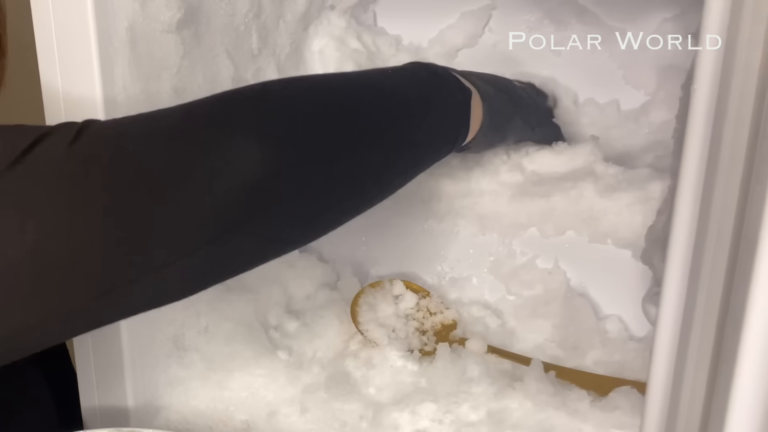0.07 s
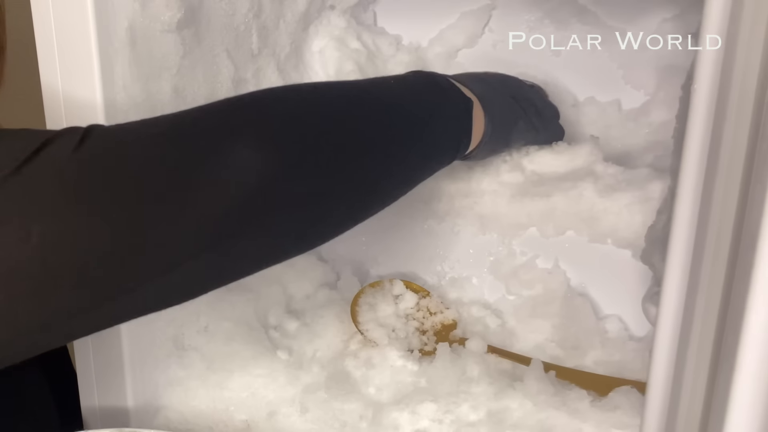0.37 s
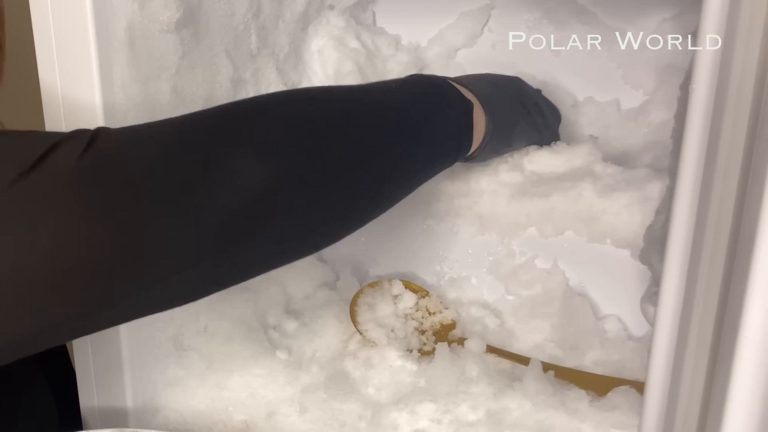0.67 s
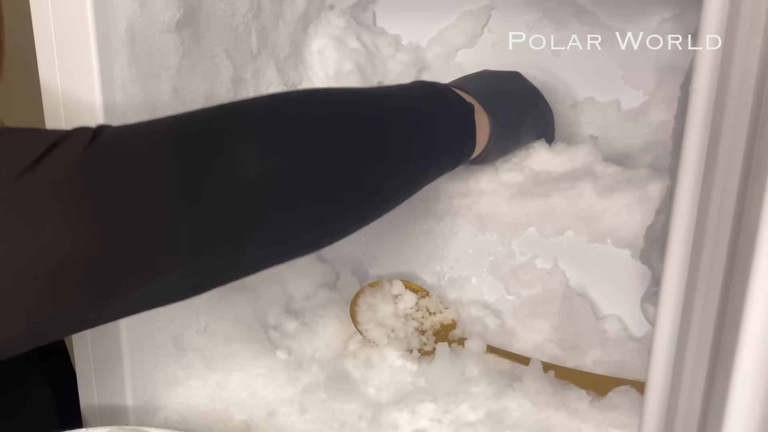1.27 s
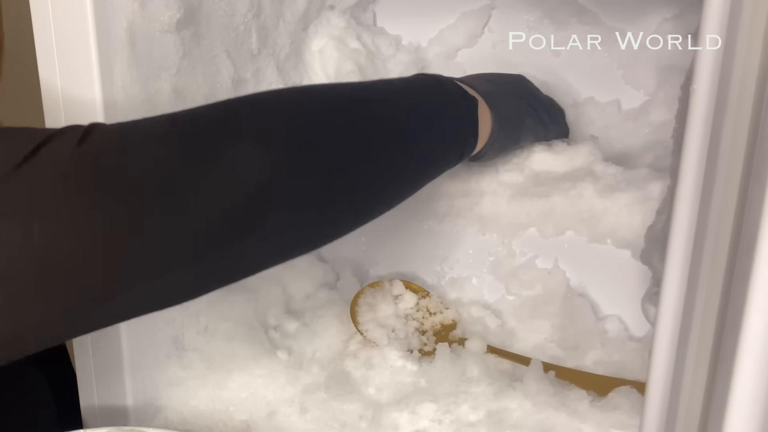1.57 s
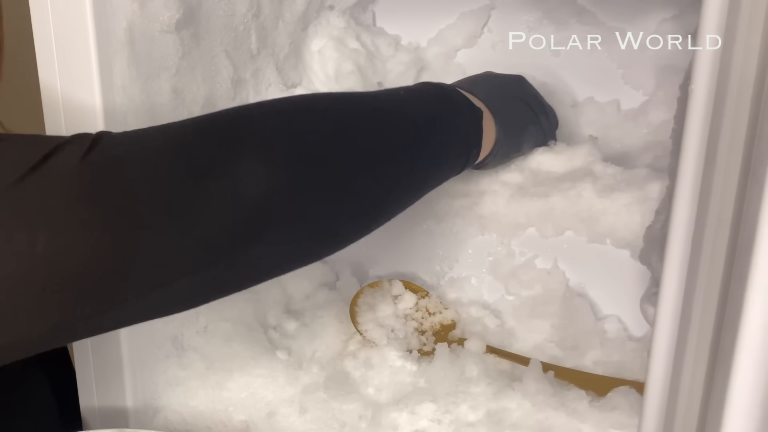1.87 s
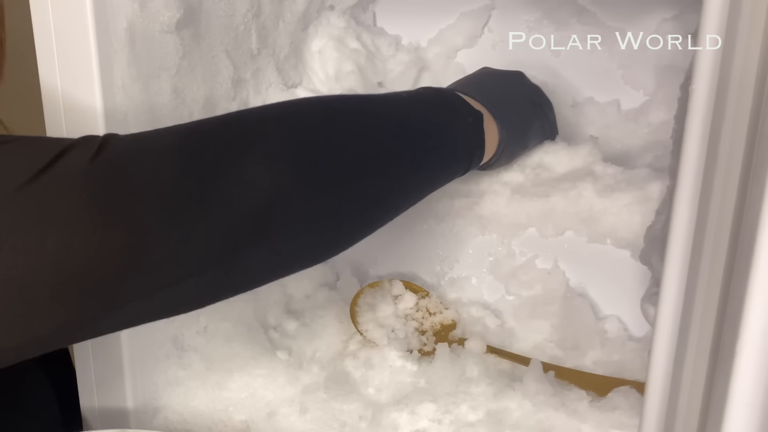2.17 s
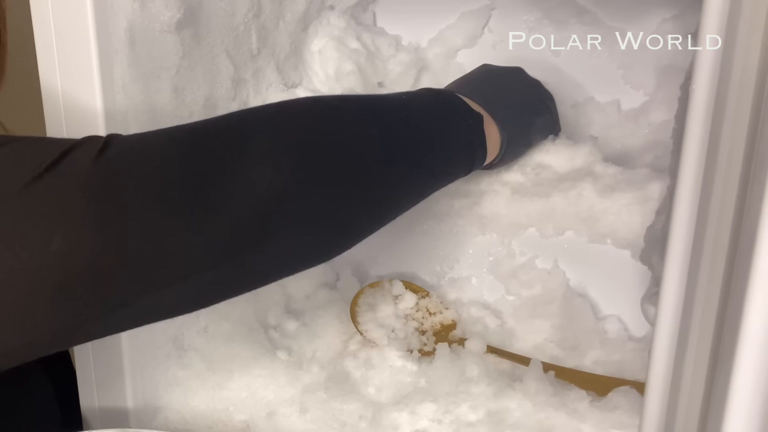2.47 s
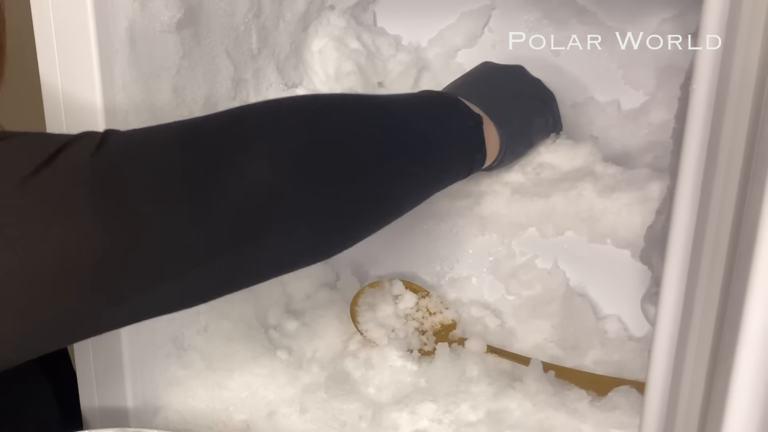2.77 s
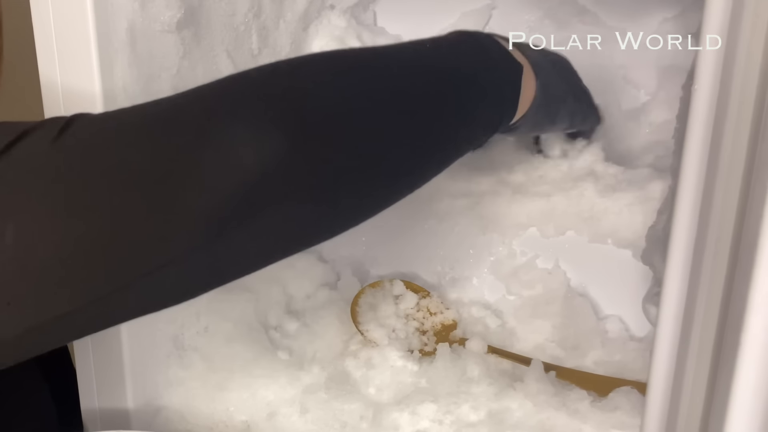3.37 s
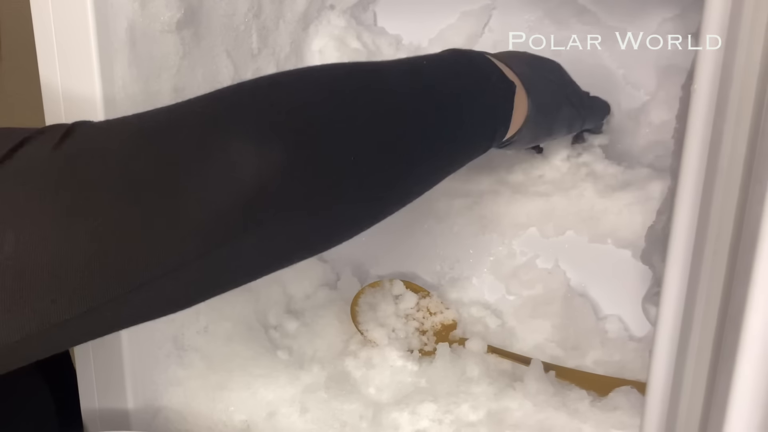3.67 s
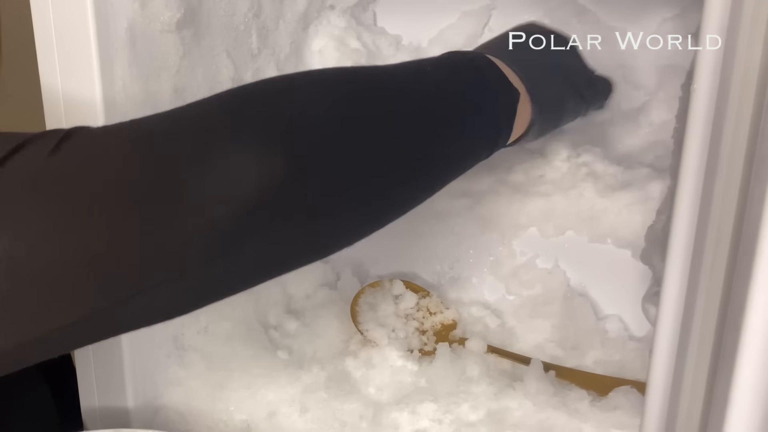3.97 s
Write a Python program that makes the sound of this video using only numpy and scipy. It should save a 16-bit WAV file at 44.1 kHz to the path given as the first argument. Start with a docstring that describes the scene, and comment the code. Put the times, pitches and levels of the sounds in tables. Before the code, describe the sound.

A gloved hand scrapes frost inside a chest freezer. A loud crunchy stroke cracks the crust and stutters with hollow thumps, a softer, longer stroke chatters too, then light brushing follows. It sounds close, over a faint hum.

```python
"""Two hard, crunchy scrapes come first: a gloved hand is clearing frost inside a chest freezer.
Each stroke crushes ice grains, then chatters as the glove sticks and slips. Every slip rasps and
thumps the hollow liner (the plastic inner wall). Crust cracks off and crystals snap, and at the end
the glove brushes lightly over loose frost. The box rings briefly and rumbles under the hand's
weight, over a faint hum."""
import sys
import numpy as np
from scipy import signal
from scipy.fft import rfft, irfft
from scipy.io import wavfile

SR = 44100
rng = np.random.default_rng(int(sys.argv[2]) if len(sys.argv) > 2 else 0)


def log_audio(samples):
    """Write samples as a 16-bit WAV file to the path given in sys.argv[1]."""
    # one column per channel
    frames = np.atleast_2d(samples).T
    # limit to full scale, then quantise
    limited = np.clip(frames, -1, 1)
    pcm = np.round(limited * 32767).astype(np.int16)
    wavfile.write(sys.argv[1], SR, pcm)


N = 176400
T = np.arange(N) / SR

# Tone of the quiet room air: f/Hz, level/dB
AIR_TONE = [(20, -2.5), (40, 3.5), (60, 12), (110, 1.5), (200, 0.5), (400, -6.5), (1000, -12.5),
            (3000, -20.5), (8000, -23.5), (16000, -29.5)]
# Tone of the flexing cabinet: f/Hz, level/dB
CABINET_TONE = [(22, -25), (35, -9), (50, -6), (63, 1.5), (76, -9), (92, -1), (108, -15), (250, -51)]
# Rumble under the hand's weight: t/s, level/dB
LEANING = [(0, -47.5), (.53, -51), (.62, -46), (.7, -52), (1.04, -52), (1.12, -59.5), (1.6, -63),
           (1.8, -55), (2.15, -49), (2.24, -52), (2.6, -48), (2.72, -57.5), (3.4, -68), (4, -76.5)]
# Notes at which the air in the box rings: f/Hz, width/Hz, level/dB
BOX_NOTES = [(186, 18, 6), (454, 11, 9), (604, 18, 2), (846, 15, 4), (1003, 12, 2), (1183, 40, -7),
             (1446, 30, -5), (1504, 30, -3), (1588, 32, -2), (1799, 30, -3), (2400, 26, -3), (2491, 30, -2),
             (3017, 50, -1), (3730, 24, -1), (4450, 150, -7)]
# How long echoes in the box last: f/Hz, time to fade by 60 dB/s
ECHO_FADE = [(200, .25), (1000, .21), (2500, .16), (6000, .1), (16000, .06)]
# Notes at which the liner rings: f/Hz, level/dB, time to fade by 60 dB/s
LINER_NOTES = [(64, -22, .2), (92, -14.5, 0.27), (136.2, -19, 0.46), (164.7, -9, 0.11), (185.8, 3.5, .11),
               (237, -4.5, 0.082), (270.5, -8.5, .08), (435, -10, 0.064), (599.6, -11, 0.34)]
# Squeaks of the glove on ice: middle t/s, length/s, level/dB, f/Hz, width/Hz
SQUEAKS = [(0.365, 0.023, -40, 10000, 4830), (1.405, 0.037, -51, 2750, 2200),
           (2.986, 0.021, -61, 8400, 1100), (3.18, 0.027, -59.5, 7600, 1500),
           (3.751, 0.023, -60.5, 5040, 1300), (3.907, 0.0029, -66.5, 7540, 1470)]
# Single crystals snapping: t/s, level/dB
SNAPS = [(0.03, -33), (0.104, -24), (.397, -20), (0.475, -31), (.49, -42), (.715, -39), (.747, -44),
         (.884, -39), (1.037, -38), (1.054, -37), (1.239, -38), (1.583, -38), (1.904, -32), (2.172, -44),
         (3.074, -44), (3.224, -37), (3.935, -55.5)]
# Crust breaking off: t/s, level/dB, knock f/Hz, knock level against the crack/dB, crumble time/s
CRACKS = [(.0255, -21, 910, -12, 0.023), (.042, -26, 477, 8.5, 0.0073), (.058, -29.5, 474, 8, 0.024),
          (0.068, -29.5, 890, 12, 0.0094), (0.099, -27, 930, -1, 0.0042), (0.139, -29, 802, 7, 0.013),
          (0.6131, -14.5, 1130, -4, 0.0046), (.62, -27.5, 1470, 3.5, 0.0092), (.629, -26, 680, 8.5, 0.0036),
          (1.564, -43.5, 1830, 0, 0.0083), (2.37, -36, 1127, 16.5, .0038), (2.627, -58, 910, 26.5, 0.0051),
          (2.67, -56, 830, 7, 0.0055), (3.546, -50, 1140, -3, .009), (3.681, -55, 1160, -16, 0.0037),
          (3.895, -62, 1218, -4, 0.022)]
# Tone of breaking crust: f/Hz, level/dB
CRUST_TONE = [(100, -10), (300, -4), (600, 0), (1200, 0.5), (2000, -6), (3400, -7), (5000, -14),
              (8000, -15), (11000, -21), (16000, -27)]
# Slips of the glove: middle t/s, length/s, rasp level/dB, thump level/dB
SLIPS = [(0.681, 0.0077, -31, -27.5), (0.709, 0.012, -31, -33.5), (0.748, 0.011, -29.5, -31),
         (0.771, 0.0078, -32.5, -36), (0.8, 0.0037, -25.5, -28), (0.835, 0.0054, -26.5, -30),
         (.866, 0.0066, -37.5, -33.5), (0.886, 0.0071, -33.5, -45), (0.903, 0.006, -36, -39),
         (0.927, 0.0045, -32.5, -33.5), (0.938, 0.0065, -33.5, -35), (0.96, 0.0062, -34.5, -37),
         (0.999, 0.0097, -30.5, -35.5), (1.038, 0.0057, -28, -34.5), (1.052, 0.002, -43, -35),
         (1.08, 0.0039, -26.5, -29.5), (1.62, 0.0077, -37.5, -60), (1.653, 0.0076, -39, -64),
         (1.681, 0.0072, -42.5, -54), (1.694, 0.0074, -42, -56), (1.706, 0.004, -36, -66),
         (1.72, 0.0081, -33.5, -60), (1.747, 0.0054, -39, -41), (1.78, 0.0054, -32.5, -38),
         (1.799, 0.0083, -35, -40), (1.821, 0.013, -41, -36), (1.841, 0.0076, -42, -44),
         (1.865, 0.0076, -37.5, -35), (1.884, 0.0052, -39, -35), (1.905, 0.01, -39.5, -46),
         (1.927, 0.0072, -38.5, -52), (1.947, 0.011, -45, -37.5), (1.971, 0.0058, -38.5, -38),
         (1.998, 0.0058, -37, -45), (2.024, 0.0062, -36.5, -33.5), (2.047, 0.0033, -37.5, -36.5),
         (2.081, 0.007, -37, -34), (2.105, 0.0064, -42, -39), (2.132, 0.0058, -39, -31.5),
         (2.159, 0.0043, -45, -35.5), (2.194, 0.005, -35.5, -33.5), (2.21, 0.0055, -54, -35.5),
         (2.238, 0.0043, -34, -29), (2.295, 0.0036, -34, -32), (2.331, 0.0036, -38.5, -30),
         (2.365, 0.0028, -45, -37.5), (2.373, 0.0053, -34.5, -31), (2.417, 0.0034, -40, -28.5),
         (2.458, 0.0022, -51, -39), (2.492, 0.0025, -34.5, -29), (2.535, 0.0038, -31.5, -30.5),
         (2.581, 0.0045, -40, -29.5), (2.628, 0.0056, -47, -30), (2.672, 0.0026, -48, -36.5)]
# Tones of a slip's rasp and of the frost's groan: f/Hz, level/dB
RASP_TONE = [(100, -8), (300, 1.5), (600, -6.5), (1200, 1), (2000, -5), (3000, -11.5), (4500, -10.5),
             (6000, -16), (8000, -17), (10500, -23.5), (13000, -25), (16000, -30)]
GROAN_TONE = [(60, -19), (115, -13), (190, 5.5), (300, 1), (500, 0), (1100, -4.5), (1800, -13),
              (4000, -32.5)]
# Loudness of the sliding glove in its three moves: t/s, level/dB
FIRST_STROKE = [(0, -26.5), (.012, -37), (.023, -29), (.027, -35), (.072, -31), (.085, -30), (.128, -36.5),
                (.136, -28), (.141, -33.5), (.172, -30.5), (.185, -38.5), (.204, -33.5), (.21, -34),
                (.255, -31.5), (.272, -37.5), (.29, -27), (.308, -41.5), (.34, -32), (.348, -33),
                (.38, -34), (.405, -42), (.42, -30), (.465, -38), (.52, -29.5), (.6, -35.5), (.66, -39),
                (.93, -37.5), (.98, -47), (1.085, -44), (1.135, -63)]
SECOND_STROKE = [(1.17, -58), (1.22, -54), (1.29, -49), (1.37, -51.5), (1.395, -47.5), (1.45, -51),
                 (1.5, -58), (1.515, -46.5), (1.535, -57.5), (1.556, -47), (1.568, -38.5), (1.6, -47.5),
                 (1.7, -48), (1.76, -49), (1.95, -50.5), (2.25, -60), (2.45, -63.5), (2.6, -60.5),
                 (2.7, -68)]
BRUSHING = [(2.695, -70), (2.715, -48), (2.738, -55.5), (2.76, -45.5), (2.79, -44), (2.82, -56.5),
            (2.9, -53), (3.05, -59.5), (3.08, -55), (3.14, -60), (3.215, -59), (3.228, -56), (3.31, -53),
            (3.41, -55.5), (3.46, -58), (3.55, -51.5), (3.62, -54), (3.672, -64), (3.688, -51),
            (3.735, -59.5), (3.765, -58.5), (3.79, -70), (4, -79)]
# Tones of the coarse, packed and loose frost under those moves: f/Hz, level/dB
COARSE_TONE = [(60, -27), (100, -7.5), (150, -10), (200, -1), (330, -5.5), (450, -3.5), (650, 0),
               (880, -0.5), (1200, -3.5), (2000, -8), (2900, -16), (4400, -15.5), (6200, -22.5),
               (8000, -20), (10300, -29.5), (12500, -27.5), (16000, -35)]
PACKED_TONE = [(60, 0), (130, -12), (200, -1), (330, -6), (600, 4.5), (1000, 0.5), (1700, -3), (2400, -8),
               (3200, -17), (4500, -15.5), (6200, -25), (8500, -23.5), (10500, -32.5), (13000, -30.5),
               (16000, -38)]
LOOSE_TONE = [(60, -28), (100, -14), (190, -5), (300, -10.5), (420, -10), (800, -9), (1150, -8.5),
              (2000, -15.5), (3000, -23), (4500, -20), (7600, -24.5), (10500, -31), (13000, -31),
              (16000, -34)]
# Treble boost or cut on the rubbing: t/s, level/dB
TREBLE = [(0, -2), (.1, 4.5), (.23, 8.5), (.3, -3.5), (.36, 6), (.55, 3), (.8, -4), (1.2, -1.5), (1.42, 10),
          (1.62, 10.5), (1.9, 0.5), (2.2, 7), (2.5, 11), (2.8, -7.5), (3.05, 0), (3.33, 7.5), (3.55, -1.5),
          (3.75, 4), (3.85, -15.5)]


def amp(db):
    """Turns decibels into a gain."""
    return 10 ** (np.asarray(db) / 20)


def unit(x):
    """Scales a sound to an average power of 1."""
    return x / np.sqrt(np.mean(x ** 2) + 1e-20)


def look_up(points, hz):
    """Reads a table along a pitch (log-frequency) scale."""
    f, value = np.transpose(points)
    return np.interp(np.log(hz + 1), np.log(f), value)


def level(points):
    """Gain along a loudness curve, silent outside it."""
    s, db = np.transpose(points)
    return amp(np.interp(T, s, db)) * (T >= s[0] - .01) * (T <= s[-1] + .02)


def add(mix, s, sound):
    """Mixes a sound in, starting at s seconds."""
    part = mix[max(round(s * SR), 0):][:len(sound)]
    part += sound[:len(part)]


def keep_band(x, kind, hz, order):
    """Lets only the lows, the highs or a band between them through."""
    return signal.sosfilt(signal.butter(order, hz, kind, fs=SR, output="sos"), x)


def colour(x, tone, size=4096):
    """Gives a sound a table's tone; only the differences between its levels count."""
    log_gain = np.log(amp(look_up(tone, abs(np.fft.fftfreq(size, 1 / SR)))))
    spectrum = np.exp(np.conj(signal.hilbert(log_gain)))  # rings after a click, never before
    taps = np.fft.ifft(spectrum).real[:size // 2]
    return signal.oaconvolve(x, taps / np.linalg.norm(taps))[:len(x)]


def wander(hz):
    """A smooth random wobble, up to about hz wiggles a second."""
    rolloff = 1 + (np.fft.rfftfreq(N, 1 / SR) / hz) ** 4
    return unit(irfft(rfft(rng.standard_normal(N)) / rolloff, N))


def grains(per_s, spread_db):
    """Tiny breaks in the ice: random clicks whose sizes vary with spread_db."""
    size = amp(spread_db * np.minimum(rng.exponential(1, N), 4))
    return unit(size * rng.choice([-1, 1], N) * (rng.random(N) < per_s / SR))


def clumps(per_s, spread_db, wobble_db, wobble_hz):
    """Grains breaking in bunches, so their loudness wobbles."""
    return unit(grains(per_s, spread_db) * amp(wobble_db * wander(wobble_hz)))


def room(hum_hz=60):
    """Quiet air and the wavering hum of the freezer's compressor."""
    hum = np.sin(2 * np.pi * hum_hz * T) * (1 + 0.12 * wander(hz=5))
    return amp(-66.5) * colour(rng.standard_normal(N), AIR_TONE) + amp(-68) * unit(hum)


def cabinet_rumble():
    """The cabinet flexes and rumbles while the hand leans on it."""
    return level(LEANING) * unit(colour(rng.standard_normal(N), CABINET_TONE, size=16384))


def box_echo(x, notes_db=-6.5, echo_db=-10.5, absorb_hz=6000):
    """The air in the box rings and echoes briefly; frost soaks up the treble."""
    out = x.copy()
    for hz, width, db in BOX_NOTES:
        out += amp(db + notes_db) * signal.lfilter(*signal.iirpeak(hz, hz / width, SR), x)
    t = T[:SR // 3]
    bounces = rng.choice([-1, 1], len(t)) * (rng.random(len(t)) < 4000 / SR) * (t > .002)
    hz, s, spectrum = signal.stft(bounces, SR, nperseg=128)
    fade = amp(-60 * s / look_up(ECHO_FADE, hz)[:, None])
    tail = signal.istft(spectrum * fade, SR, nperseg=128)[1]
    echo = signal.oaconvolve(x, tail / np.linalg.norm(tail))[:N]
    return out + amp(echo_db) * keep_band(echo, "lowpass", absorb_hz, order=1)


def liner_ring(swell_s=0.0034):
    """After one tap, the hollow plastic wall swells and rings with low notes."""
    t = T[:SR // 4]
    notes = sum(amp(db - 60 * t / fade_s) * np.sin(2 * np.pi * hz * t) for hz, db, fade_s in LINER_NOTES)
    return notes * (1 - np.exp(-t / swell_s))


def crumbs(tick_s=0.00072, band_hz=(4300, 8600)):
    """Loose crystals tick now and then, louder the harder the hand works."""
    effort = level(FIRST_STROKE) + level(SECOND_STROKE) + level(BRUSHING)
    fades = signal.oaconvolve(grains(per_s=110, spread_db=0), np.exp(-T[:SR // 100] / tick_s))[:N]
    ticks = keep_band(fades * rng.standard_normal(N), "bandpass", band_hz, order=1)
    return amp(-35.5) * effort ** .67 * unit(ticks)


def squeaks():
    """The glove catches on smooth ice in brief, fuzzy whistles."""
    out = np.zeros(N)
    for s, length, db, hz, width in SQUEAKS:
        band_hz = [hz - width / 2, hz + width / 2]
        whistle = unit(keep_band(rng.standard_normal(N), "bandpass", band_hz, order=2))
        out += amp(db) * np.exp(-2 * ((T - s) / length) ** 2) * whistle
    return out


def snaps(fade_s=0.00071, band_hz=(2400, 7100)):
    """Single crystals break with a sharp, bright tick."""
    fades = np.zeros(N)
    for s, db in SNAPS:
        add(fades, s, amp(db) * np.exp(-T[:SR // 50] / fade_s))
    return keep_band(fades * rng.standard_normal(N), "bandpass", band_hz, order=1)


def cracks():
    """Crust breaks off with a sudden, quickly fading crunch and a dull knock."""
    crunch, knocks = np.zeros((2, N))
    t = T[:SR // 10]
    for s, db, hz, knock_db, crumble_s in CRACKS:
        fade = amp(db) * np.exp(-t / crumble_s)
        add(crunch, s, fade)
        add(knocks, s, amp(knock_db) * fade * np.sin(2 * np.pi * hz * t))
    return colour(crunch * grains(per_s=14000, spread_db=-0.5), CRUST_TONE) + knocks


def chatter(push_s=0.00066, thump_lag_s=0.00088, groan_s=0.021):
    """The glove sticks and slips: grains rasp in tiny jerks, packed frost groans, the wall thumps."""
    speed, groan_level, thumps = np.zeros((3, N))
    t, wall = T[:SR // 12], liner_ring()
    middle_s, samples = t[-1] / 2, np.arange(len(wall))
    push = t / push_s * np.exp(-2 * t / push_s)
    for s, length, rasp_db, thump_db in SLIPS:
        # A quick burst sits inside a faint creep twice as long.
        from_middle = (t - middle_s) / length
        burst = np.exp(-2 * abs(from_middle) ** 2.6)
        creep = amp(-20.5) * np.exp(-2 * (from_middle / 2) ** 2)
        add(speed, s - middle_s, amp(rasp_db) * (burst + creep))
        groan_db = 0.22 * rasp_db + 0.78 * thump_db
        add(groan_level, s - length / 3, amp(groan_db) * np.exp(-t / groan_s))
        rough_force = amp(thump_db) * push / push.sum() * (1 + .7 * rng.standard_normal(len(t)))
        # The hand's load shifts the wall's pitch, by a random amount for each slip.
        pitch_ratio = 1 + .042 * rng.uniform(-1.52, 1.7)
        loaded_wall = np.interp(samples * pitch_ratio, samples, wall, right=0)
        add(thumps, s + thump_lag_s, signal.fftconvolve(rough_force, loaded_wall))
    jerks = clumps(per_s=18000, spread_db=1.5, wobble_db=2.2, wobble_hz=600)
    rasp = amp(-0.5) * colour(speed * jerks, RASP_TONE)
    groan = amp(-8) * colour(groan_level * grains(per_s=5000, spread_db=4), GROAN_TONE)
    return rasp + keep_band(groan, "lowpass", hz=2200, order=2), amp(2.5) * thumps


def rubbing(treble_hz=2430):
    """The sliding glove crushes clumps of frost; the two hard strokes also shake the wall."""
    first, second = level(FIRST_STROKE), level(SECOND_STROKE)
    coarse = clumps(per_s=10000, spread_db=3, wobble_db=1.93, wobble_hz=45)
    packed = clumps(per_s=8800, spread_db=2.5, wobble_db=1.5, wobble_hz=210)
    loose = clumps(per_s=22000, spread_db=4, wobble_db=1.8, wobble_hz=53)
    rub = amp(2) * (colour(first * coarse, COARSE_TONE) + colour(second * packed, PACKED_TONE))
    rub += amp(0.5) * colour(level(BRUSHING) * loose, LOOSE_TONE)
    body = signal.sosfiltfilt(signal.butter(2, treble_hz, fs=SR, output="sos"), rub)
    treble = (rub - body) * amp(np.interp(T, *np.transpose(TREBLE)))
    shudder = unit(signal.oaconvolve(coarse, liner_ring())[:N])
    return body + treble + amp(-8) * (0.84 * first + second) * shudder


def scene():
    """All the sounds of the hand in the freezer, over the quiet room."""
    rasp_and_groan, thumps = chatter()
    contact = rubbing() + rasp_and_groan + cracks() + snaps() + squeaks() + crumbs()
    contact = keep_band(contact, "highpass", hz=146, order=2)  # a small contact gives off little bass
    return (box_echo(contact) + thumps + cabinet_rumble() + room())[None]


def record(dry, lowest_hz=13, highest_hz=16050):
    """Trims away the deepest bass and the highest treble."""
    treble_cut = signal.firwin(511, highest_hz, window=("kaiser", 9), fs=SR)
    return signal.oaconvolve(keep_band(dry, "highpass", lowest_hz, order=2), treble_cut[None], "same")


dry = scene()
out = record(dry)
log_audio(out)
```